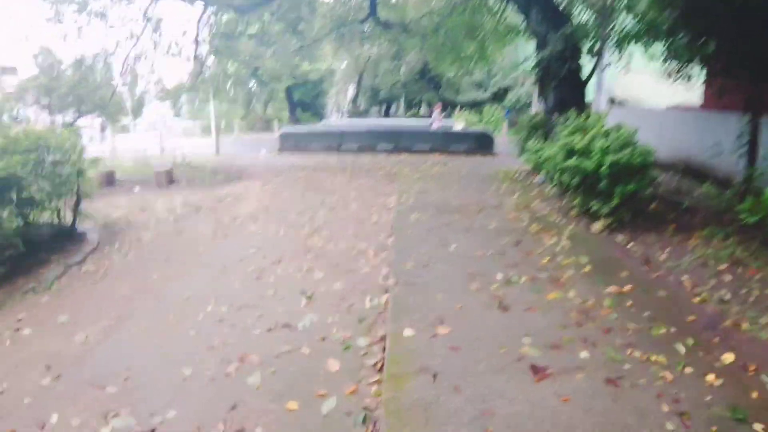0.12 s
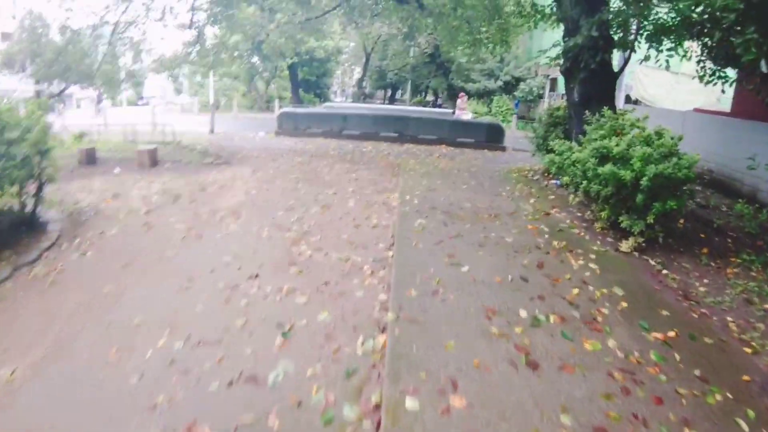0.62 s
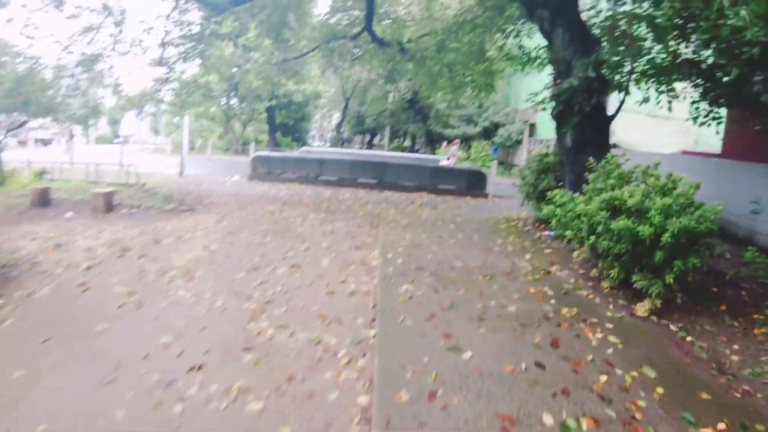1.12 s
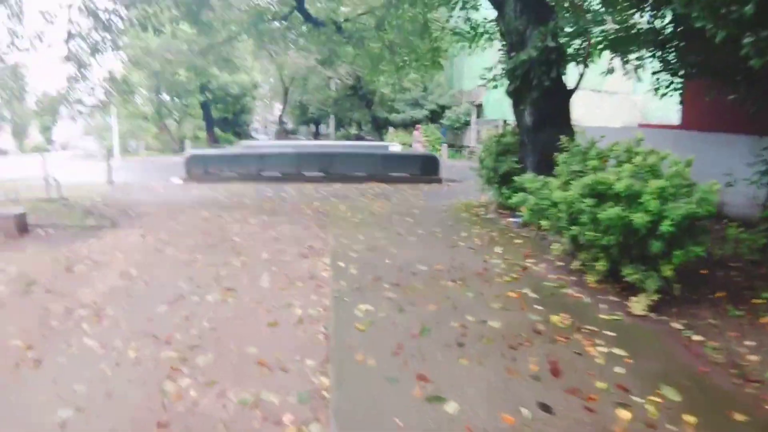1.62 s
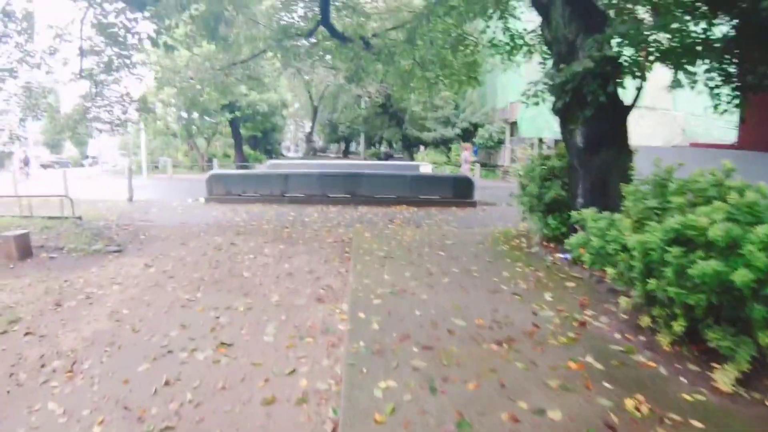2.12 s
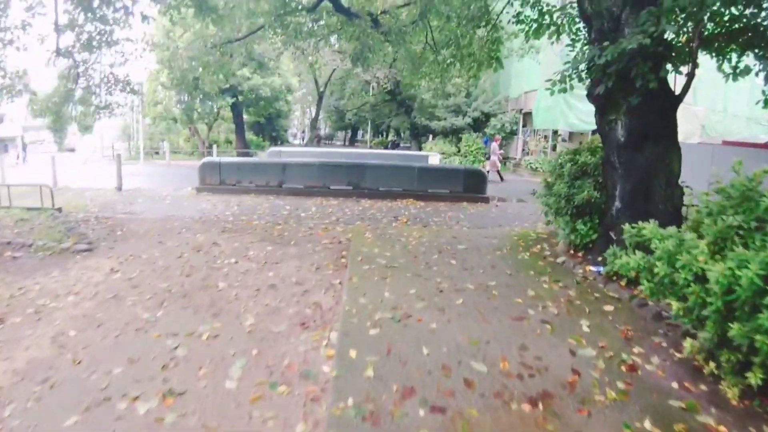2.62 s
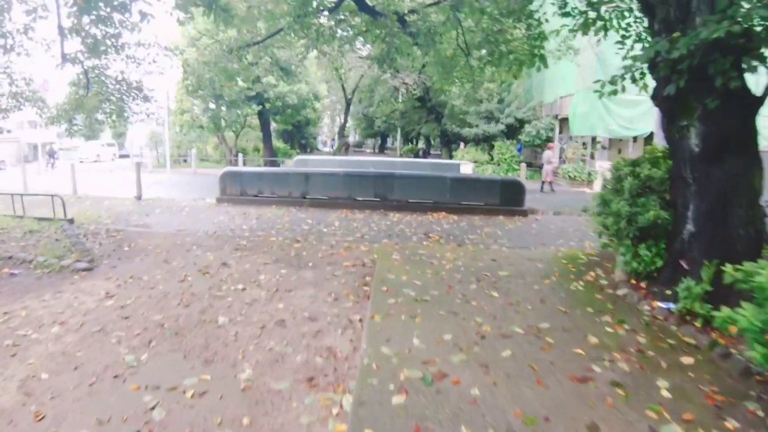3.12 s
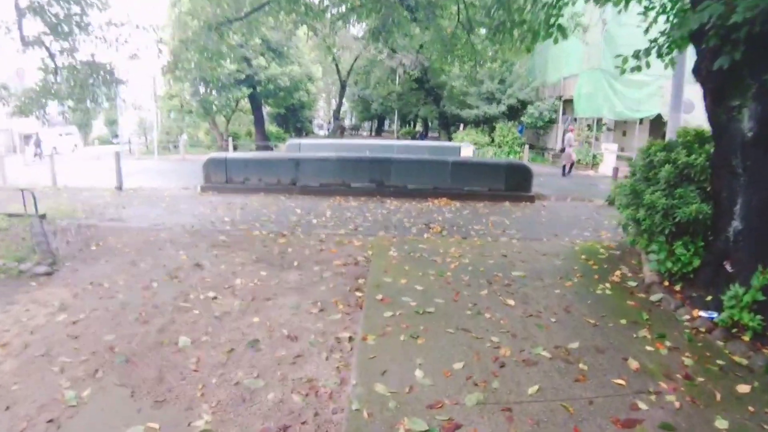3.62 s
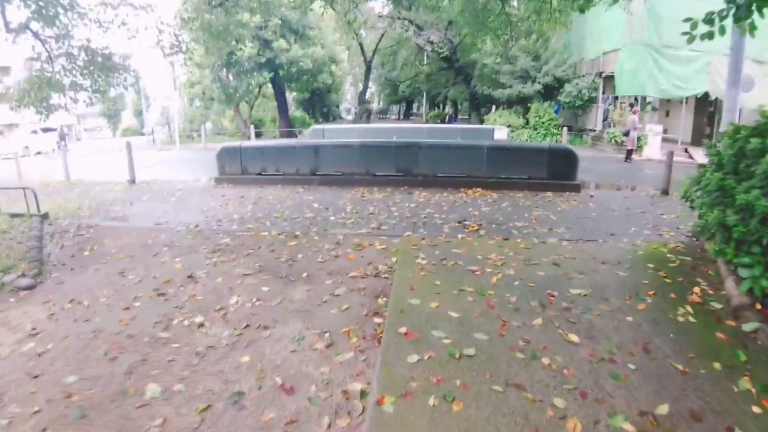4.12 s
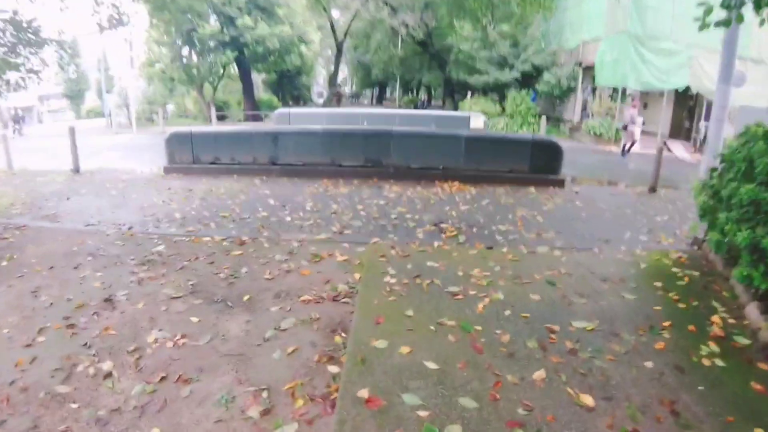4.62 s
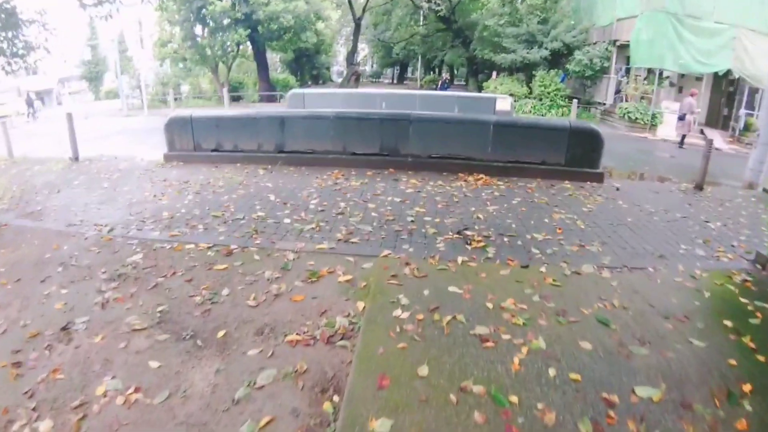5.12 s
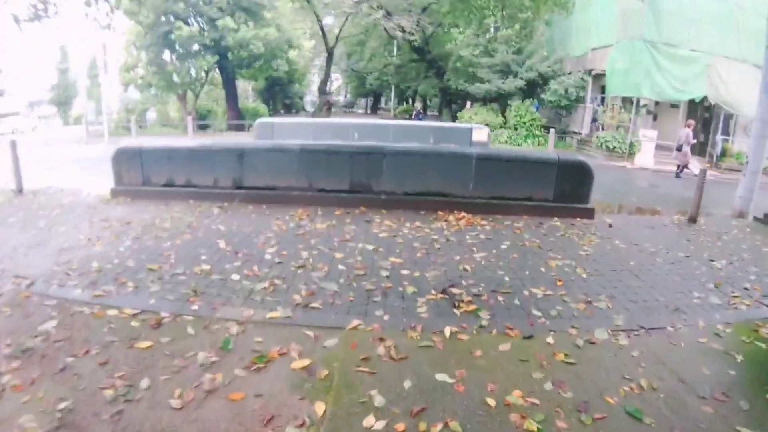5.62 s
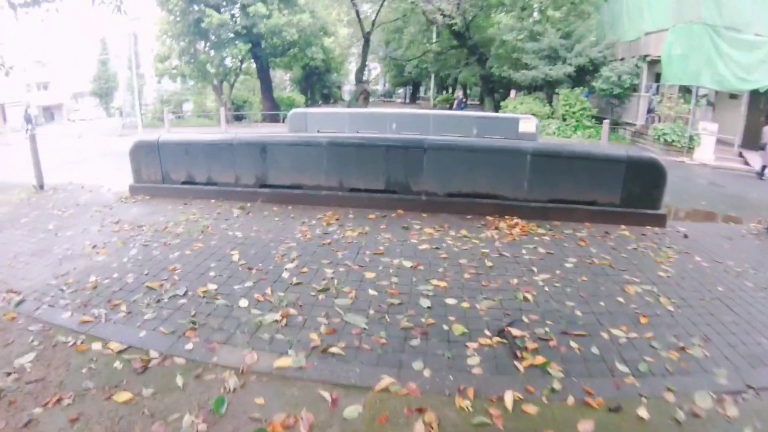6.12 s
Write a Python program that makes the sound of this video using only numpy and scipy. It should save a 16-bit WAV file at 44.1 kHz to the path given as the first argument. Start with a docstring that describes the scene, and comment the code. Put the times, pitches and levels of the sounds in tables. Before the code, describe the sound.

Walking past loud cicadas: raspy notes alternate low and piercing, fade into a long drone, with fast pulsing buzz, insect hiss and faint town rumble.

```python
"""Near cicadas in park trees swing between a low and a shrill note while a walker carries a mono
microphone past them and away: paired membrane clicks ring the resonances of a moving body.
Another kind throbs eleven times a second, with low and shrill bursts in alternation.
A shoe scuffs the path in a puff of filtered noise, a far chorus blurs into a patchy hiss,
and town traffic rumbles underneath as low noise with low hums that waver and fade in and out."""
import sys
import numpy as np
from scipy import signal
from scipy.fft import rfft, irfft
from scipy.io import wavfile
from scipy.ndimage import uniform_filter1d

SR = 44100
rng = np.random.default_rng(int(sys.argv[2]) if len(sys.argv) > 2 else 0)


def pcm_store(signal):
    """Save signal as 16-bit PCM."""
    levels = np.round(np.clip(np.atleast_2d(signal), -1, 1) * 32767)
    wavfile.write(sys.argv[1], SR, levels.astype(np.int16).T)


def undo_db(level):
    """Turn decibels back into plain size, where 20 dB means ten times bigger."""
    steps = np.asarray(level, float) / 20
    return 10 ** steps


N = 275912
EDGE_HZ = 15730  # highest frequency that record() keeps, in Hz

# When the second membrane clicks. One value a swinging singer: share of the click pair;
# the throbbing singer borrows the first.
SECOND_MEMBRANE = [.514, .504, .514, .504]


def near_singers():
    """Swinging singers, each with its own song of low notes, shrill notes and drones."""
    # Low notes, abdomen lowered, one list a singer. Each row: start in seconds, length in seconds,
    # effort in dB, body pitch factor at the start, the same at the end (before arch and sag).
    low_notes = [
        [(-.05, 0.37, -20.5, 0.97, 1.034), (.9, 0.3, -27.5, 0.99, .92), (1.67, 0.35, -26.5, 0.93, 0.91),
         (2.38, .1, -35, 0.65, 0.82), (2.62, 0.18, -27.5, 0.92, 0.93)],
        [(.32, .18, -27, 0.78, .9), (.63, 0.246, -26.5, 1, 0.99), (.92, 0.311, -26, 1.03, 0.923),
         (1.83, 0.27, -29, .93, 0.944), (2.52, .32, -26, 0.91, 0.93)],
        [],
        [(5.4, 0.52, -35.5, .96, 0.97), (6.04, .3, -35.5, .8, .9)],
    ]
    # Shrill notes, abdomen lifted, one list a singer. Each row: start in seconds, length in seconds,
    # effort in dB at the middle.
    shrill_notes = [
        [(.55, 0.39, -28.5), (1.25, 0.42, -26), (2.1, .4, -29)],
        [(1.24, 0.63, -26), (2.08, .46, -26.5), (2.82, 0.38, -26)],
        [(-.1, .44, -33.5), (.87, .31, -37)],
        [],
    ]
    # Long low drones that close a song, one list a singer. Each row: start in seconds,
    # length in seconds, effort in dB, fade in dB per second, body pitch factor.
    closing_drones = [
        [],
        [(3.187, 2.28, -26, 3.5, 0.902)],
        [(1.2, .55, -31, 8, .86)],
        [],
    ]
    # Pace of the membranes, one list a singer, silent outside its span.
    # Each row: time in seconds, click pairs per second.
    click_pace = [
        [(0, 148.7), (.1, 150.9), (.31, 154), (.42, 154.8), (.8, 153), (1.65, 152.6), (2.1, 151.4),
         (2.9, 151.5)],
        [(.3, 165), (.66, 169.7), (.95, 175.2), (1.15, 177.6), (1.42, 177.8), (1.7, 176.3), (2.4, 177.2),
         (2.8, 175.9), (3.14, 171.9), (3.26, 167.5), (3.46, 153.5), (3.6, 148), (5.3, 140)],
        [(0, 151), (.3, 151), (1.3, 147), (1.75, 133.5)],
        [(5.35, 152), (5.6, 155), (6.08, 158.3), (6.26, 159.2)],
    ]
    songs = zip(low_notes, shrill_notes, closing_drones, click_pace, SECOND_MEMBRANE)
    return sum(singer(*song) for song in songs)


def singer(lows, shrills, drones, clicking, lag):
    """Clicks ring the body; lifting the abdomen moves the sound from low to shrill resonances."""
    # Body resonances in the two postures. Each row: centre in Hz, width in Hz, relative level in dB.
    lowered_body = [(3850, 450, -14), (4450, 500, -5), (5200, 650, 0), (7000, 800, -13), (9800, 900, -22)]
    lifted_body = [(4400, 900, -20), (11800, 1200, -9), (12900, 1600, -3), (14200, 1800, 0),
                   (15600, 1800, -.5)]
    low_size, shrill_size, pitch = posture(lows, shrills, drones)
    pairs_hz = curve(clicking)[0]
    # clicking loses its beat once slowed under this share of its top rate
    falter_at, falter_span = .865, .033
    unsteady = np.clip((falter_at - pairs_hz / pairs_hz.max()) / falter_span, 0, 1)
    heard = slice(round(clicking[0][0] * SR), round(clicking[-1][0] * SR))
    clicks = tymbals(pairs_hz, second=.55, lag=lag, jitter=.0004 + .09 * unsteady, rough=.12)
    low_clicks = ribs(clicks, sweep_s=.024)[heard]
    low = evened(moving_body(low_clicks, lowered_body, pitch[heard]))
    shrill = evened(body(ribs(clicks, sweep_s=.009), lifted_body))[heard]
    voice = np.zeros(N)
    voice[heard] = low_size[heard] * low + shrill_size[heard] * shrill
    flutter_db = 2.0 * slow(size=1500)  # effort wavers within a note
    return trees(voice * undo_db(flutter_db), wet_db=-6, t60=.07)


def posture(lows, shrills, drones):
    """Strength of the low and the shrill voice and the body pitch, built note by note."""
    low_attack_s, low_release_s, drone_release_s = 0.031, 0.037, .2
    low_swell_db = -0.5  # negative: a low note starts 0.5 dB up and ends 0.5 dB down
    tail_db_per_s, tail_s = 105, 0.075  # after its end a low note dies away
    # body pitch arches up within a low note and drops in its tail (added to the factor)
    rise, sag_depth, sag_s = 0.038, .14, 0.032
    shrill_attack_s, shrill_release_s = 0.063, .06
    shrill_arch_db = 2.5  # a shrill note is loudest in its middle
    shrill_leak_db = -25  # shrill resonances still heard under the low voice

    t = np.arange(N) / SR
    low, shrill, pitch = np.zeros(N), np.zeros(N), np.ones(N)
    for s, length, db, first, last in lows:
        done = np.clip((t - s) / length, 0, 1)
        after = np.maximum(t - s - length, 0)
        effort_db = db + low_swell_db * (2 * done - 1) - tail_db_per_s * after
        low += undo_db(effort_db) * held(t - s, length + tail_s, low_attack_s, low_release_s)
        arch = rise * np.sin(np.pi * done)
        sag = sag_depth * np.clip(after / sag_s, 0, 1)
        pitch = np.where(t >= s, first + (last - first) * done + arch - sag, pitch)
    for s, length, db, fade_db, factor in drones:
        fading = undo_db(db - fade_db * np.abs(t - s))
        low += fading * held(t - s, length, low_attack_s, drone_release_s)
        pitch = np.where(t >= s, factor, pitch)
    for s, length, db in shrills:
        arch = np.sin(np.pi * np.clip((t - s) / length, 0, 1)) - 1
        effort = undo_db(db + shrill_arch_db * arch)
        shrill += effort * held(t - s, length, shrill_attack_s, shrill_release_s)
    return low, shrill + undo_db(shrill_leak_db) * low, pitch


def held(since, length, attack_s, release_s):
    """Straight attack, hold, straight release."""
    return np.clip(since / attack_s, 0, 1) * np.clip((length - since) / release_s, 0, 1)


def tymbals(pairs_hz, second, lag, jitter, rough):
    """Left and right membranes click in turn; the second is weaker and a little off the middle."""
    turns = np.cumsum(pairs_hz * (1 + jitter * slow(size=900))) / SR
    out = np.zeros(N + 16)
    for size, shift in ((1, 0), (second, lag)):
        count = np.arange(1, int(turns[-1]))
        scatter = 0.16 * rng.standard_normal(2000)[:len(count)]  # in samples
        at = np.interp(count + shift, turns, np.arange(N)) + scatter + 1
        # windowed sinc places each click between samples
        near = at.astype(int)[:, None] + np.arange(-8, 9)
        offset = near - at[:, None]
        click = np.sinc(offset) * np.cos(offset * np.pi / 18) ** 2
        strength = 1 + rough * rng.standard_normal(2000)[:len(at), None]
        np.add.at(out, near + 7, size * click * strength)
    return evened(out[7:N + 7])


def ribs(x, sweep_s):
    """A membrane's ribs buckle one after another: each click sweeps up, sweep_s late at EDGE_HZ."""
    hz = np.fft.rfftfreq(N, 1 / SR)
    return irfft(rfft(x) * np.exp(-1j * np.pi * sweep_s * hz ** 2 / EDGE_HZ), N)


def moving_body(x, modes, pitch):
    """Steep resonances that slide with the pitch factor: shift down, smooth twice, shift back."""
    out = np.zeros(len(x))
    for k, (mode_hz, width_hz, db) in enumerate(modes):
        turn = np.exp(2j * np.pi * mode_hz * np.cumsum(pitch) / SR)
        r = np.exp(-np.pi * width_hz / SR)
        smooth = signal.lfilter([(1 - r) ** 2], [1, -2 * r, r * r], x / turn + 1e-18)
        out += (-1) ** k * undo_db(db) * (turn * smooth).real
    return out


def body(x, modes):
    """Sum of steep resonances with neighbours in opposite phase."""
    hz, gain = np.fft.rfftfreq(N, 1 / SR), 0
    for k, (mode_hz, width_hz, db) in enumerate(modes):
        gain = gain + (-1) ** k * undo_db(db) / (1 + 2j * (hz - mode_hz) / width_hz) ** 2
    return irfft(rfft(x) * gain, N)


def trees(x, wet_db, t60):
    """Scattering off trunks, leaves and ground; three tails take turns as the listener walks."""
    out, t = x.copy(), np.arange(N) / SR
    for k in range(3):
        decay = undo_db(-60 * np.arange(8000) / SR / t60)
        taps = rng.standard_normal(8000) * (rng.random(8000) < .05) * decay
        share = np.sqrt(2 / 3) * np.cos(np.pi * (1.8 * t + k / 3))  # the three powers sum to 1
        out += undo_db(wet_db) * signal.oaconvolve(x * share, taps / np.linalg.norm(taps))[:N]
    return out / np.sqrt(1 + undo_db(2 * wet_db))


def evened(x):
    """Scale to rms 1."""
    return x / np.sqrt(np.mean(x ** 2) + 1e-20)


def curve(rows):
    """Straight lines between the rows of a table, one signal for each column after the time."""
    s, *columns = np.transpose(rows)
    return [np.interp(np.arange(N) / SR, s, c) for c in columns]


def slow(size):
    """Smooth random wander of rms 1."""
    return evened(uniform_filter1d(uniform_filter1d(rng.standard_normal(N), size), size))


def throbber():
    """The abdomen pumps: low and shrill bursts alternate and each low burst sags in pitch."""
    # Pumping. Each row: time in seconds, throbs so far; whole numbers fall on the low note.
    throb_count = [(0, -.47), (2.27, 24.7), (4, 43.76), (6.26, 68.1)]
    # Each row: time in seconds, effort in dB.
    throb_effort = [(0, -33), (.6, -32), (1.1, -31.5), (1.6, -31), (1.9, -29), (2.25, -24.5), (2.8, -28.5),
                    (3.4, -28.5), (3.8, -33), (4.3, -33), (4.8, -40), (6.26, -45)]
    # Body resonances in the two postures. Each row: centre in Hz, width in Hz, relative level in dB.
    lowered_body = [(5500, 450, -.5), (5850, 550, 0), (6300, 600, -12)]
    lifted_body = [(7180, 2100, -16.5), (13750, 1700, -14.5), (15700, 1800, -21.5)]
    # Membrane pace with the abdomen lowered, then lifted: click pairs per second.
    posture_pairs_hz = 155.8, 159.3
    turn = 2 * np.pi * curve(throb_count)[0]
    low = np.clip(.5 + 1.58 * (np.cos(turn) - .1), 0, 1)
    high = np.clip(.5 - 1.2 * (np.cos(turn) + 0.11), 0, 1)
    pairs_hz = posture_pairs_hz[0] * low + posture_pairs_hz[1] * (1 - low)
    clicks = tymbals(pairs_hz, second=.4, lag=SECOND_MEMBRANE[0], jitter=.001, rough=.2)
    pitch = 1 - .018 * np.sin(turn)
    lowered = moving_body(ribs(clicks, sweep_s=.02), lowered_body, pitch)
    lifted = body(ribs(clicks, sweep_s=.008), lifted_body)
    voice = (low * lowered + high * lifted) / lowered.std()
    return trees(undo_db(curve(throb_effort)[0]) * voice, wet_db=-8, t60=.05)


def scuffs():
    """A shoe on the path: a short puff of grit noise."""
    # Each row: start in seconds, peak level in dB, centre in Hz.
    shoe_scuffs = [(1.23, -41.5, 1710)]
    out, t = np.zeros(N), np.arange(N) / SR
    for s, db, hz in shoe_scuffs:
        puff = np.clip((t - s) / 0.013, 0, 1) * np.exp(-np.clip(t - s - .015, 0, 9) / 0.044)
        grit = evened(body(rng.standard_normal(N), [(hz, 700, 0)]))
        out += undo_db(db) * puff * grit
    return out


def chorus():
    """Countless far singers merge into a patchy hiss."""
    # Colour of the hiss. Each row: frequency in Hz, relative density in dB per Hz.
    chorus_spectrum = [(1290, -35), (2200, -33), (3110, -14.5), (3370, -11), (4380, -3), (4800, -1.5),
                       (5250, -6), (5430, -0.5), (8120, -11.5), (9250, -25), (10700, -14.5), (12100, -15),
                       (13700, -12), (15600, -11.5)]
    # Each row: time in seconds, level in dB before tilt and patches, tilt (boost above 9 kHz) in dB.
    chorus_motion = [(0, -25, 2), (.55, -25.5, 4), (1, -25.5, 4.5), (1.5, -28.5, 7.5), (2, -25.5, 1.5),
                     (3, -27, 4), (4, -28, 2.5), (5, -29, 1.5), (6.26, -29.5, 0)]
    level_db, tilt_db = curve(chorus_motion)
    scale = hiss(chorus_spectrum, patchy_db=0.0).std()
    return undo_db(level_db) * hiss(chorus_spectrum, patchy_db=1.5, tilt_db=tilt_db) / scale


def hiss(spectrum, patchy_db, tilt_db=0):
    """Noise from random short-time spectra, with smooth patches in time and frequency."""
    frames, hz = N // 256 + 5, np.fft.rfftfreq(1024, 1 / SR)
    a, b, patches = rng.standard_normal((frames, 513, 3)).T
    patches = uniform_filter1d(patches, size=12, axis=0)  # across frequency
    patches = evened(uniform_filter1d(patches, size=14, axis=1))  # across time
    f, db = np.transpose(spectrum)
    field = np.interp(np.log(hz + 1), np.log(f + 1), db)[:, None] + patchy_db * patches
    tilt = np.interp(np.arange(frames) * 256 - 256, np.arange(N), tilt_db * np.ones(N))
    field = field + (hz > 9000)[:, None] * tilt
    return signal.istft((a + 1j * b) * undo_db(field), nperseg=1024, noverlap=768)[1][:N]


def town():
    """Traffic: a broad rumble with low hums that waver and fade in and out within it."""
    # Colour of the rumble. Each row: frequency in Hz, relative density in dB per Hz.
    rumble_spectrum = [(12, -37), (20, 5), (71, -2), (128, -6), (294, -5), (376, -10.5), (600, -12),
                       (998, -10.5), (1920, -24.5), (2350, -25.5), (2600, -25), (3380, -33), (5720, -120)]
    # Each row: start in seconds, length in seconds, pitch in Hz before waver, level in dB before fades.
    low_hums = [(0, 0.46, 101.8, -43), (0, 0.24, 33.8, -44), (0.334, 1, 64.1, -42.5),
                (1.451, 0.16, 74.4, -42.5), (1.727, 0.47, 81.7, -38), (2.28, 0.32, 169.3, -45),
                (2.504, 1, 37.4, -46), (2.893, 0.29, 59.5, -43), (5.41, .75, 52, -45)]
    rumble_db = -35.5
    out = undo_db(rumble_db) * evened(hiss(rumble_spectrum, patchy_db=0.63))
    waver = 1 + 0.026 * slow(size=6000)
    for s, length, hz, db in low_hums:
        part = out[round(s * SR):][:round(length * SR)]  # a view: adding to it adds to out
        turns = hz * np.cumsum(waver[round(s * SR):][:len(part)]) / SR
        fades = signal.windows.tukey(len(part), .5)
        part += np.sqrt(2) * undo_db(db) * fades * np.sin(2 * np.pi * turns)
    return out


def scene():
    """All sources reach one microphone, heard alike on both channels."""
    mono = near_singers() + throbber() + scuffs() + chorus() + town()
    return np.array([mono, mono])


def roll_off(x):
    """The treble ends steeply here."""
    return signal.sosfilt(signal.butter(12, 16750, fs=SR, output="sos"), x)


def record(dry):
    """A steep low-pass limits the band at EDGE_HZ."""
    edge = signal.firwin(1023, EDGE_HZ, window=("kaiser", 9), fs=SR)
    limited = signal.oaconvolve(dry, edge[None], "same")
    return roll_off(limited)


dry = scene()
out = record(dry)
pcm_store(out)
```